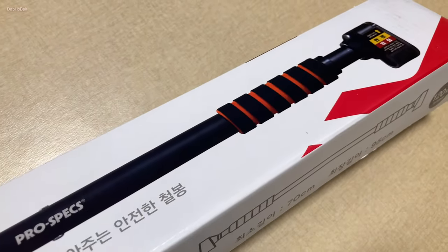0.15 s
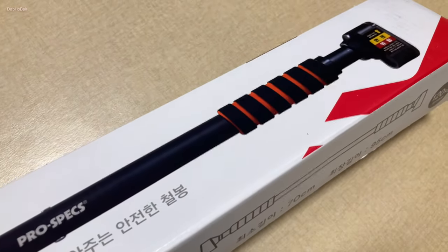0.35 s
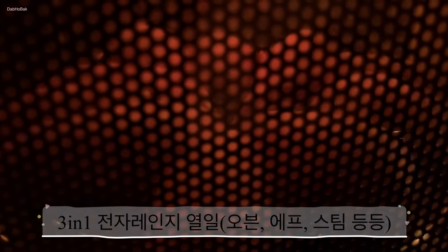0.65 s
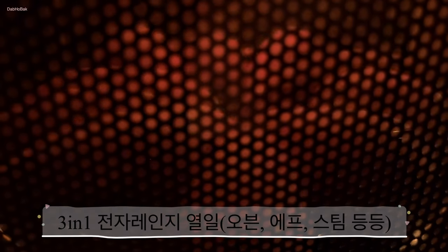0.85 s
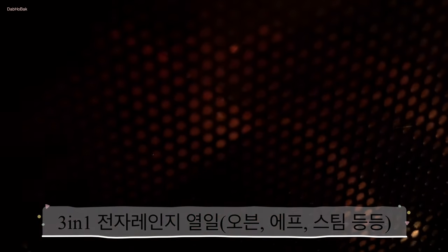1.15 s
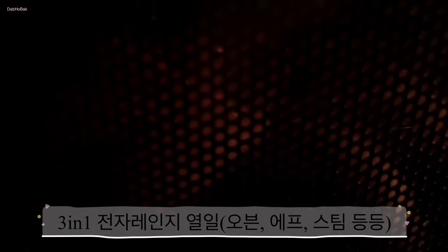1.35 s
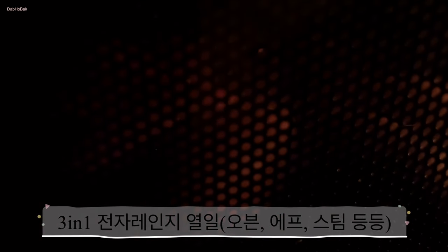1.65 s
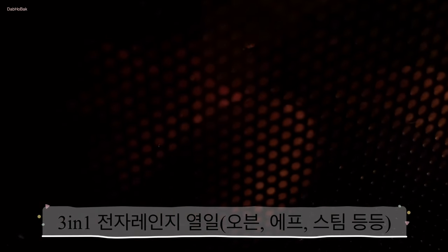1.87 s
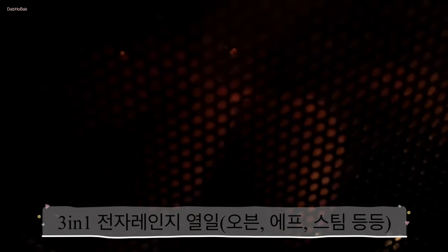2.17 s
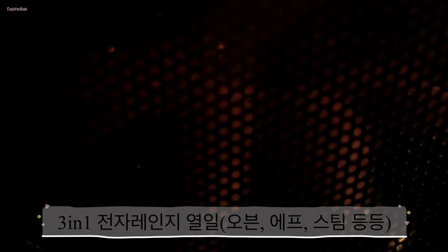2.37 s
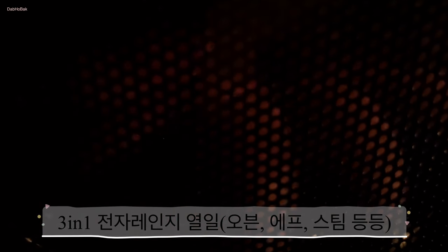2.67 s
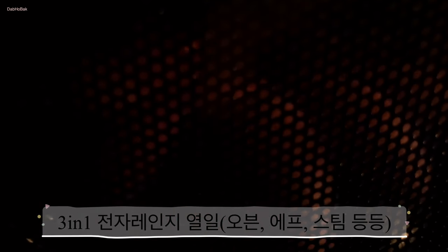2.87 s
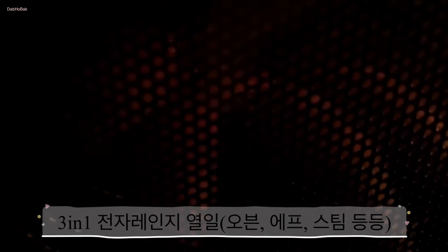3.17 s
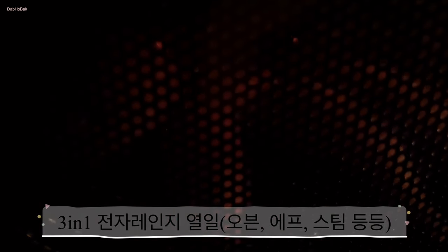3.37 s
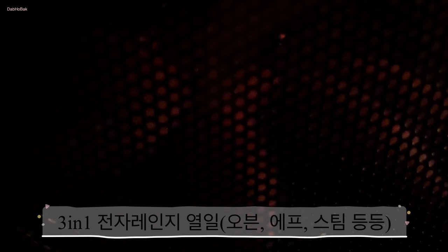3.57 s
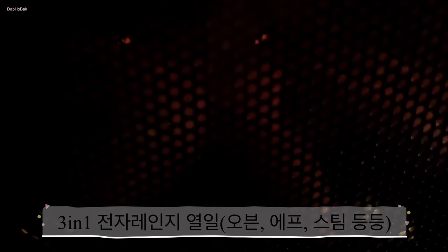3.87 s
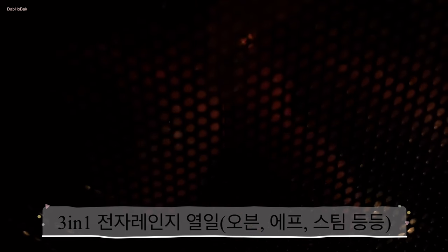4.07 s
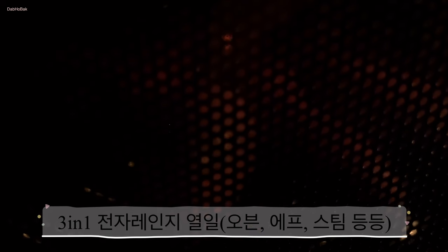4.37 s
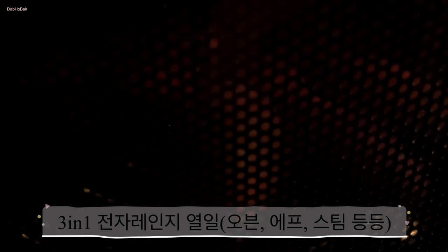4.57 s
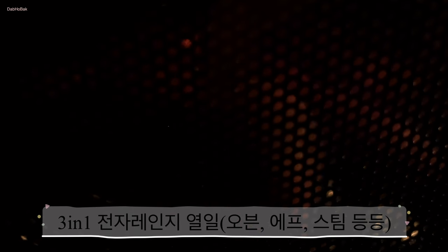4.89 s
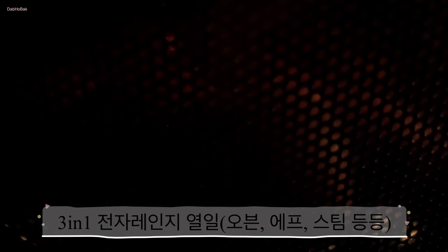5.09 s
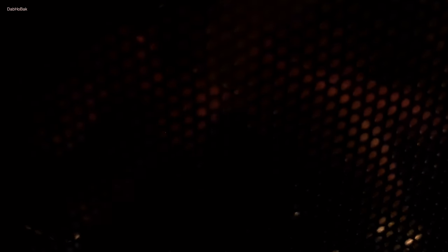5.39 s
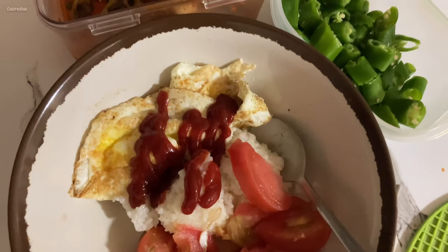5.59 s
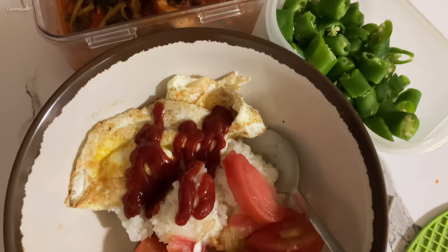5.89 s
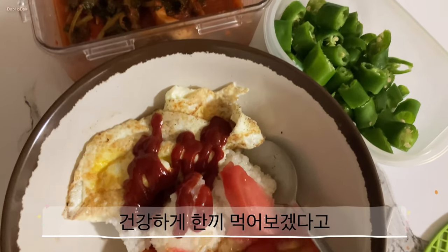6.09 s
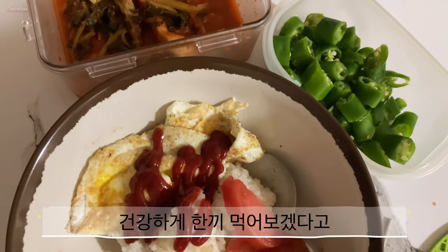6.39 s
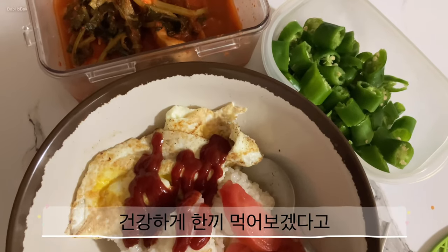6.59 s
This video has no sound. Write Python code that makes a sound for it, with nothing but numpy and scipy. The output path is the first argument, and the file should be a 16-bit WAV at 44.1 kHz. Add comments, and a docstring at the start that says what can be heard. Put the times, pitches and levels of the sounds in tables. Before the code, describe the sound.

Near silence with dull finger taps and low grip thumps on a hand-held device, then a hard cut clicks into a running microwave: steady mains hum, turntable motor whir, fan air ringing steel, sparse faint fat spits and two crisp pops. A heavy thump and click end it, leaving a quiet kitchen with a few faint hooting tones. Close stereo.

```python
"""A microwave oven runs close to a hand-held phone: mains hum, a turntable motor, fan noise that rings the
steel cabinet, and fat spitting and popping inside. Before it comes near silence with finger taps on the
case, after it a quiet kitchen with a few faint tones; hard cuts that click join these three moments.
Hum, motor and tones are sine waves, air and fat are shaped noise, pops are noise and fading sines,
taps and grips are low thumps. Everything is heard in stereo, at the phone's two sound ports."""
import sys
import numpy as np
from scipy import signal
from scipy.fft import rfft, irfft, next_fast_len
from scipy.io import wavfile
from scipy.ndimage import uniform_filter1d

SR = 44100
rng = np.random.default_rng(int(sys.argv[2]) if len(sys.argv) > 2 else 0)


def output_pcm(signal):
    """Save a mono or channel-first signal as 16-bit PCM at the path in sys.argv[1].

    Samples are clipped to [-1, 1] before scaling.
    """
    pcm = np.clip(np.atleast_2d(signal).T, -1, 1) * 32767
    wavfile.write(sys.argv[1], SR, np.round(pcm).astype(np.int16))


N = 297234
T = np.arange(N) / SR  # time of every sample, s

# stereo spread of noise, side against middle: pitch_hz, level_db
WIDTH = [(60, -8.5), (110, -12), (200, -5), (380, -9), (700, -1), (1290, -3), (2380, -0.5), (4400, -2),
         (8120, -0.5), (15000, -2.5)]
# stereo balance of noise, left minus right: pitch_hz, level_db
LEAN = [(60, -0.5), (110, -0.5), (200, -0.5), (380, 2), (700, 0), (1290, 1.5), (2380, 0.5), (4400, -1),
        (8120, -0.5), (15000, 1.5)]
# colour of the hush before the oven: pitch_hz, relative level_db per Hz
HUSH = [(15, -40), (25, -5.5), (65, -0.5), (87, -7), (358, -26.5), (3410, -47), (7300, -48.5),
        (9080, -57.5), (11300, -46), (15200, -64), (16500, -56)]
# colour of the kitchen after the oven: pitch_hz, relative level_db per Hz
KITCHEN = [(15, -53), (25, -19.5), (87, 0), (172, -9.5), (197, -6), (445, -10), (538, -9.5), (584, -13),
           (831, -15), (979, -17), (4500, -42), (5500, -51), (15200, -63.5), (16500, -60)]
# faint far-off tones: start_s, length_s, pitch_hz, level_db (rms, before wavering), roughness (0 to 1)
HOOTS = [(5.774, 0.18, 336, -51, 1), (6.245, .07, 745, -55, .8), (6.29, .07, 840, -56, .8),
         (6.445, 0.26, 376, -48, .35)]
# the hand shifts its grip: start_s, peak_db, final pitch_hz, time_to_peak_s
GRIPS = [(.002, -37, 80, 0.038), (.07, -27.5, 62, 0.022), (0.1149, -10.5, 83.4, .0105),
         (.1225, -22, 48, 0.014), (.373, -20, 74.4, 0.02), (.4, -27, 41, .015), (0.4594, -17.5, 55, 0.028),
         (.492, -28, 49.6, 0.019), (2.37, -41, 47, .03), (2.93, -37, 57, 0.026), (3.06, -39, 52, .03),
         (3.27, -38, 43, .03), (5.425, -24.5, 45, .04), (5.495, -23, 44, .035), (.47, -31, 31, .035)]
# finger taps: start_s, thump peak_db, final pitch_hz, glide_s, time_to_peak_s,
# compactness (higher is a shorter thump), nail_db (gain of the nail sounds)
TAPS = [(0.103, -15.5, 90, .005, 0.012, 4.6, -56), (.172, -42, 51, .004, 0.018, 2.5, -63),
        (0.3634, -33.5, 89, 0.0031, 0.019, 2.6, -36), (.446, -52, 70, 0.0032, .005, 1.6, -51),
        (.476, -32, 80, 0.0014, 0.0079, 3, -53), (.487, -39, 90, 0.0031, 0.0056, 1.4, -62),
        (5.393, -10, 71.6, 0.003, 0.0085, 1.1, -37), (5.83, -41, 80, 0.0011, .013, 2.2, -70),
        (5.879, -36, 85, 0.0013, 0.013, 2.2, -67), (5.94, -39, 85, .0012, .012, 2.2, -70),
        (6.0, -41, 85, 0.0013, .011, 2.2, -68), (6.204, -47, 90, .003, .01, 1.5, -56)]
# clicks at the hard cuts: start_s, left_jump, right_jump (full scale is 1)
CLICKS = [(.5317, -0.19, -0.2), (.5427, -0.043, 0.077), (5.5482, 0.096, 0.11)]
# droplets popping against the wall: start_s, gain level_db
POPS = [(1.3247, -36.5), (5.4295, -34)]
# tones in a pop: pitch_hz, relative level_db, fade_s (to -60 dB)
POP_MODES = [(1750, 6, .018), (2200, -1, 0.018), (2750, -3, .014), (3400, -7, .012), (4150, 0, .016),
             (5650, -8, .012), (7100, -6, .013), (7750, -2, .013), (8300, -6, .011), (10630, -6, .011),
             (11600, 0, 0.011), (12300, -3, .011), (15200, -7, .01)]
# fat spitting: start_s, gain level_db, burst_s (fade to -60 dB; a burst of 0 is silent)
SPITS = [(.754, -63.5, 0.06), (0.987, -41.5, 0.09), (1.21, -71, 0.2), (1.7948, -67, .09),
         (2.2837, -70, 0.14), (2.9081, -69, 0.2), (3.4775, -69, 0), (4.5331, -74, 0.1)]
# colour of a spit, its body and its fizz: pitch_hz, width_hz, relative level_db
SPIT_BODY = [(2600, 2200, -1.5), (5200, 3000, -4.5)]
SPIT_FIZZ = [(7150, 2200, -2), (11100, 2000, -1), (15200, 1000, -14)]
# fan air: pitch_hz, relative level_db per Hz
FAN = [(25, -27), (70, -14.5), (110, -11.5), (135, -10.5), (200, -18.5), (260, -14.5), (500, -19.5),
       (930, -24), (1500, -34.5), (2000, -35), (3500, -47), (5500, -57.5), (8000, -64.5), (9200, -84.5),
       (11300, -68), (13500, -83.5), (16500, -94)]
# cancelling reflections off the door: pitch_hz, width_hz, share removed (0 to 1)
DOOR_NOTCHES = [(674, 67, 0.85), (1520, 90, 0.46), (2120, 80, .3)]
# cabinet panels and ducts that the air rings: pitch_hz, width_hz, relative level_db
CABINET = [(96.8, 11, -48.5), (148.5, 11, -45.5), (126.8, 11, -50), (160.8, 5.4, -46.5), (222.2, 12, -54.5),
           (323.7, 14, -47), (339.7, 10, -53), (371, 14, -49.5), (410.5, 36, -48.5), (499.4, 20, -56),
           (781, 90, -57.5), (859, 74, -60), (936, 130, -54.5), (1330, 160, -59.5), (1605, 110, -67),
           (1784, 120, -62), (2020, 200, -67), (2307, 200, -66), (2770, 110, -72), (2923, 80, -75.5),
           (3190, 55, -76.5), (3370, 270, -72.5), (4180, 180, -79), (6880, 720, -76.5)]
# turntable motor and gears: multiple of the shaft rate -> level_db (rms, after the loud scrap),
# left_minus_right_db
MOTOR = {11: (-44, 3), 12: (-50.5, -4.5), 17: (-56.5, 1), 19: (-59, 9.2), 20: (-59.5, -1), 23: (-48.5, 2),
         26: (-55, -4.5), 27: (-53, 1), 28: (-60, 8), 29: (-57.5, 5), 30: (-64, 5), 33: (-56, -2),
         51: (-68.5, -2.5), 55: (-63.5, 3), 57: (-69, -4), 60: (-67.5, 0), 70: (-71, -4), 80: (-73, -1)}
# transformer and case buzz: multiple of the mains -> level_db (rms, after the loud scrap, before balance),
# waver_db
HUM = {2: (-35, 1.2), 4: (-55.5, 1.6), 6: (-47, 3.2), 8: (-54.5, 1.5)}

# the three hard cuts: hush to a loud scrap of oven, scrap to running oven, oven to kitchen
SCRAP_CUT_S, OVEN_CUT_S, KITCHEN_CUT_S = .5317, .5427, 5.5482
LATE_SHARE = .47  # share of the side that is the same wave arriving late at one port
HUSH_DB, KITCHEN_DB = -49, -46.5  # rms
KITCHEN_FLUTTER_DB, BASS_TOP_HZ, BASS_DROP_S, BASS_DROP_DB = 0.6, 100, 6.46, -5
HOOT_OCTAVE_DB, HOOT_EDGE_S = -13, .03
HOOT_WAVER_DB, HOOT_WAVER_HZ = 3.5, 8  # at full roughness
TAP_HZ = 900  # pitch at first touch
FLEX_LAG_TURNS = 0.083  # the flexing reaches the left port this part of a cycle later
GRIP_SAG, GRIP_GLIDE_S, GRIP_COMPACT = 1.08, .021, 6  # sag is first pitch over final pitch
TICK_HZ, TICK_RISE_S, TICK_FALL_S = 1275, .0012, .0022
SNAP_HZ, SNAP_DB, SNAP_S = 4700, -1, .00025
GRIT_DB, GRIT_FALL_S = -27, 0.022
CLICK_FALL_S = 0.00035
CAVITY_S = .3  # the oven cavity's fade to -60 dB
POP_RISE_S, POP_HISS_DB, POP_HISS_S, POP_TAIL_DB = 0.0013, -3, 0.015, -26
POP_LAG_TURNS = 0.24  # part of a cycle between the two ports
SPIT_RISE_SHARE, SPIT_BODY_DB = 0.053, 2.5  # rise as a share of the burst; body against fizz
CAVITY_DB, CAVITY_DB_PER_DECADE = 15, 26.5  # longer bursts fill the cavity more
FAN_DB, RING_DB = -37.5, -37  # rms after the loud scrap
FLUTTER_DB, AIR_FLUTTER_DB, FLUTTER_PER_S = 1.5, 1.0, 18
SCRAP_AIR_DB, SCRAP_STEEL_DB, SCRAP_HUM_DB = 13.5, 15, 4  # extra level in the scrap between two cuts
MAINS_HZ = 60
SHAFT_HZ = MAINS_HZ / 4
MOTOR_WAVER_DB, MOTOR_SLIP_TURNS = 1.5, .06
HUM_PAN_DB = -2  # left minus right
TOP_HZ = 16300


def undb(db):
    """Turn decibels into a plain multiplier."""
    return 10 ** (np.asarray(db) / 20)


def level(x, db):
    """Scale a sound to an rms level in dB."""
    return x * undb(db) / np.sqrt(np.mean(x ** 2))


def on_log(table, hz):
    """Read a pitch and level table on a log-frequency axis."""
    table_hz, db = np.transpose(table)
    return np.interp(np.log(np.maximum(hz, 1)), np.log(table_hz), db)


def walk(rate):
    """Random levels held 1 / rate s, then smoothed twice; spread near 1."""
    hold = int(SR / rate)
    steps = np.repeat(rng.standard_normal(N // hold + 1), hold)
    return 1.59 * uniform_filter1d(uniform_filter1d(steps, hold), hold)[:N]


def peak(hz, centre_hz, width_hz):
    """Gain of a resonance, 1 at its centre."""
    return 1 / np.sqrt(1 + ((hz ** 2 - centre_hz ** 2) / (width_hz * np.maximum(hz, 1))) ** 2)


def noise(gain, extra_side_db=0):
    """Stereo noise shaped by a gain per pitch: the ports share a middle and get opposite sides."""
    size = next_fast_len(N, True)
    hz = np.arange(size // 2 + 1) * SR / size
    mid, other = rfft(rng.standard_normal((2, size))) * gain(hz)
    # 1j shifts the middle by a quarter cycle
    side = 1j * LATE_SHARE * mid + np.sqrt(1 - LATE_SHARE ** 2) * other
    side = side * undb(on_log(WIDTH, hz) + extra_side_db)
    lean = undb(on_log(LEAN, hz) / 2)
    return irfft(np.array([(mid + side) * lean, (mid - side) / lean]), size)[:, :N]


def peaks_noise(colour, extra_side_db=0):
    """Noise coloured by a few sharpened resonances."""
    return noise(lambda f: sum(undb(db) * peak(f, hz, width) ** 3 for hz, width, db in colour), extra_side_db)


def bands(gain, flutter_db, rate):
    """Noise in octave bands (centre Hz, sound); each band wavers in level on its own."""
    def part(f, centre):
        octaves_away = np.log2(np.maximum(f, 1) / centre)
        return np.cos(np.clip(octaves_away, -1, 1) * np.pi / 2)

    return [(centre, noise(lambda f: gain(f) * part(f, centre)) * undb(flutter_db * walk(rate)))
            for centre in 20 * 2. ** np.arange(11)]


def after(s, end):
    """The samples from s to end, and their seconds after s."""
    span = slice(int(np.ceil(s * SR)), min(int(np.ceil(end * SR)), N))
    return span, T[span] - s


def hush():
    """Hand rumble and microphone hiss, as shaped noise before the first cut."""
    return level(noise(lambda f: undb(on_log(HUSH, f))), HUSH_DB) * (T < SCRAP_CUT_S)


def kitchen():
    """Distant appliances and traffic, as wavering noise after the last cut; the bass thins near the end."""
    drop = undb(BASS_DROP_DB * np.clip((T - BASS_DROP_S) / .04, 0, 1))
    far = bands(lambda f: undb(on_log(KITCHEN, f)), KITCHEN_FLUTTER_DB, 9)
    total = sum(band * (drop if centre < BASS_TOP_HZ else 1) for centre, band in far)
    return level(total, KITCHEN_DB) * (T >= KITCHEN_CUT_S)


def hoots():
    """Short tones with an octave above; the rougher ones waver more in level and pitch."""
    out = 0
    for s, length, hz, db, rough in HOOTS:
        phase = 2 * np.pi * np.cumsum(hz + rough * HOOT_WAVER_HZ * walk(30)) / SR
        edge = np.clip(np.minimum(T - s, s + length - T) / HOOT_EDGE_S, 0, 1)
        loudness = np.sqrt(2) * edge * undb(db + rough * HOOT_WAVER_DB * walk(40))
        out = out + loudness * (np.sin(phase) + undb(HOOT_OCTAVE_DB) * np.sin(2 * phase))
    return out


def flex(s, db, first_hz, last_hz, glide, top_s, compact):
    """The case flexes: highs arrive first, then the low swing; a thump still sounding at a cut is cut off."""
    ports = np.array([[1], [-1]]) / 2
    span, t = after(s, min(end for end in (SCRAP_CUT_S, KITCHEN_CUT_S, s + 20 * top_s) if end > s))
    # cycles so far: the pitch slides from first_hz towards last_hz
    turns = last_hz * t + (first_hz - last_hz) * glide * (1 - np.exp(-t / glide)) - FLEX_LAG_TURNS * ports
    swell = (t / top_s * np.exp(1 - t / top_s)) ** compact
    return span, t, undb(db) * swell * np.sin(2 * np.pi * turns)


def grips():
    """The hand shifts its grip: soft low swings that sag a little in pitch."""
    out = np.zeros((2, N))
    for s, db, hz, top_s in GRIPS:
        span, _, body = flex(s, db, GRIP_SAG * hz, hz, GRIP_GLIDE_S, top_s, GRIP_COMPACT)
        out[:, span] += body
    return out


def taps():
    """A thump falls from high to low; the nail adds a short case tick, a bright snap and skin scrape."""
    out = np.zeros((2, N))
    grit = level(peaks_noise([(4500, 3600, 0)]), GRIT_DB)
    for s, db, last_hz, glide, top_s, compact, nail_db in TAPS:
        span, t, body = flex(s, db, TAP_HZ, last_hz, glide, top_s, compact)
        tick_shape = np.minimum(t / TICK_RISE_S, 1) * np.exp(-t / TICK_FALL_S)
        tick = -tick_shape * np.sin(2 * np.pi * TICK_HZ * t)
        snap = undb(SNAP_DB) * t / SNAP_S * np.exp(-t / SNAP_S) * np.sin(2 * np.pi * SNAP_HZ * t)
        scrape = np.exp(-t / GRIT_FALL_S) * grit[:, span]
        out[:, span] += body + undb(nail_db) * (tick + snap + scrape)
    return out


def clicks():
    """A step in the waveform at each hard cut, fading at once."""
    out = np.zeros((2, N))
    for s, left, right in CLICKS:
        span, t = after(s, s + 20 * CLICK_FALL_S)
        out[:, span] += np.outer([left, right], np.exp(-t / CLICK_FALL_S))
    return out


def pops():
    """A crisp tick rings a few short modes, with a puff of hiss and a soft cavity tail."""
    hiss = level(peaks_noise(SPIT_BODY + SPIT_FIZZ), POP_HISS_DB)
    starts = rng.random((len(POPS), len(POP_MODES), 1, 1)) + POP_LAG_TURNS * np.array([[0], [1]])
    out = np.zeros((2, N))
    for (s, db), turns in zip(POPS, starts):
        span, t = after(s, min(s + CAVITY_S, KITCHEN_CUT_S))
        ring = sum(undb(mode_db - 60 * t / fade_s) * np.sin(2 * np.pi * (hz * t + turn))
                   for (hz, mode_db, fade_s), turn in zip(POP_MODES, turns))
        puff = (undb(-60 * t / POP_HISS_S) + undb(POP_TAIL_DB - 60 * t / CAVITY_S)) * hiss[:, span]
        out[:, span] += undb(db) * np.minimum(t / POP_RISE_S, 1) * (ring + puff)
    return out


def spits():
    """Each droplet bursts in a sharp hiss, and the steel cavity rings on."""
    body, fizz = (level(peaks_noise(colour, extra_side_db=4.0), -1.5) for colour in (SPIT_BODY, SPIT_FIZZ))
    hiss = fizz + undb(SPIT_BODY_DB) * body
    out = np.zeros((2, N))
    for s, db, burst in SPITS:
        span, t = after(s, min(s + CAVITY_S, KITCHEN_CUT_S))
        rise = SPIT_RISE_SHARE * burst
        tail_db = CAVITY_DB + CAVITY_DB_PER_DECADE * np.log10(burst)
        fall = undb(-60 * np.maximum(t - rise, 0) / burst)
        tail = undb(tail_db - 60 * t / CAVITY_S)
        out[:, span] += undb(db) * np.minimum(t / rise, 1) * (fall + tail) * hiss[:, span]
    return out


def fan_air():
    """Rushing fan air: wavering noise with dips where reflections off the door cancel it."""
    def gain(f):
        door = np.prod([1 - share * peak(f, hz, width) for hz, width, share in DOOR_NOTCHES], axis=0)
        return undb(on_log(FAN, f)) * door

    return level(sum(band for _, band in bands(gain, AIR_FLUTTER_DB, FLUTTER_PER_S)), FAN_DB)


def cabinet_rings():
    """Air rings the panels and ducts: narrow bands of noise, each wavering on its own."""
    total = sum(noise(lambda f: undb(db) * peak(f, hz, width) ** 2 / np.sqrt(width))
                * undb(FLUTTER_DB * walk(FLUTTER_PER_S)) for hz, width, db in CABINET)
    return level(total, RING_DB)


def motor():
    """Turntable tones at multiples of the shaft rate, shaken in level and phase by play in the gears."""
    ports = np.array([[.5], [-.5]])
    return sum(np.sqrt(2) * undb(db + MOTOR_WAVER_DB * walk(5) + pan_db * ports)
               * np.sin(2 * np.pi * (k * SHAFT_HZ * T + rng.random() + MOTOR_SLIP_TURNS * walk(4)))
               for k, (db, pan_db) in MOTOR.items())


def mains_hum():
    """Transformer and case buzz: sine waves at even multiples of the mains, wavering in level."""
    return sum(np.sqrt(2) * undb(db + waver_db * walk(20))
               * np.sin(2 * np.pi * (k * MAINS_HZ * T + rng.random())) for k, (db, waver_db) in HUM.items())


def oven():
    """Hum, motor, fan air and ringing cabinet of a running oven: a louder 11 ms scrap, then the rest."""
    gate = (T >= SCRAP_CUT_S) * (T < KITCHEN_CUT_S)
    scrap = T < OVEN_CUT_S
    ports = np.array([[.5], [-.5]])
    hum = mains_hum() * undb(SCRAP_HUM_DB * scrap + HUM_PAN_DB * ports)
    air = undb(SCRAP_AIR_DB * scrap) * fan_air()
    steel = undb(SCRAP_STEEL_DB * scrap) * (cabinet_rings() + motor())
    return gate * (hum + air + steel)


def scene():
    """All sources at the two ports."""
    return hush() + kitchen() + hoots() + grips() + taps() + clicks() + pops() + spits() + oven()


def record(dry):
    """The phone cuts the top: a steep low-pass filter."""
    return signal.sosfilt(signal.ellip(8, .2, 70, TOP_HZ, fs=SR, output="sos"), dry)


dry = scene()
out = record(dry)
output_pcm(out)
```